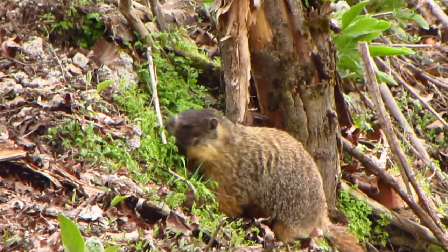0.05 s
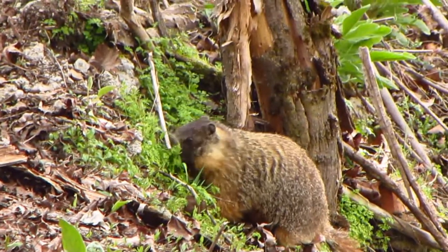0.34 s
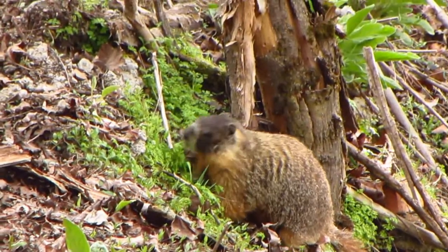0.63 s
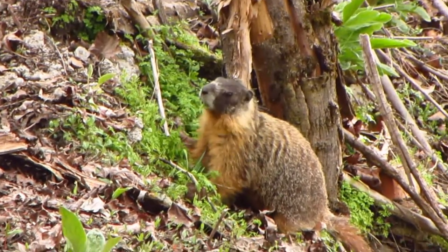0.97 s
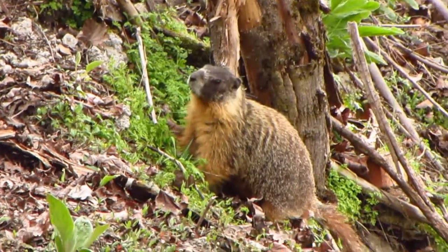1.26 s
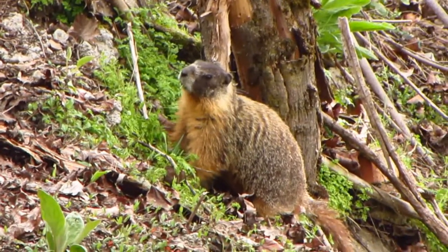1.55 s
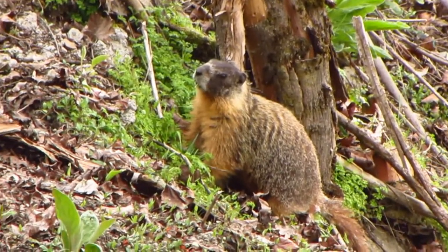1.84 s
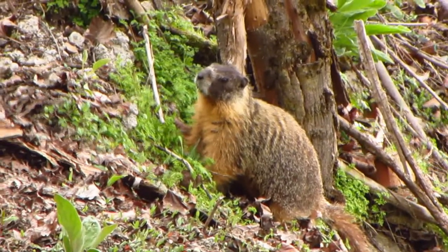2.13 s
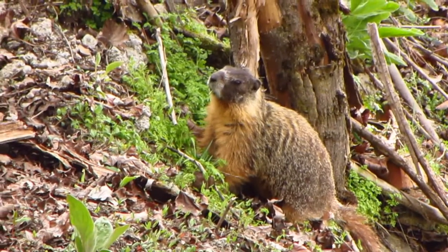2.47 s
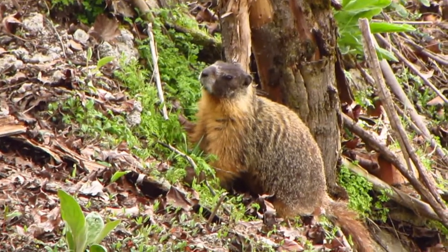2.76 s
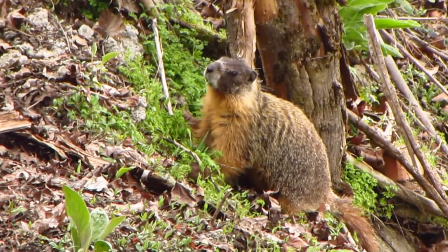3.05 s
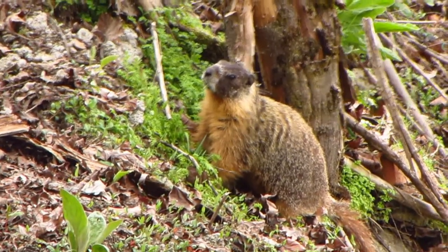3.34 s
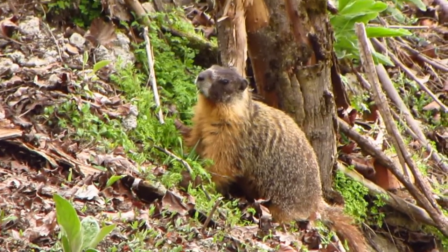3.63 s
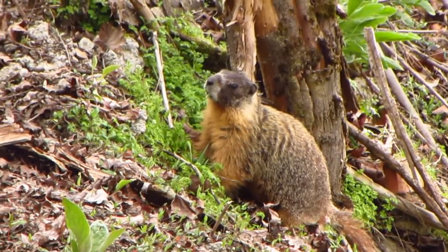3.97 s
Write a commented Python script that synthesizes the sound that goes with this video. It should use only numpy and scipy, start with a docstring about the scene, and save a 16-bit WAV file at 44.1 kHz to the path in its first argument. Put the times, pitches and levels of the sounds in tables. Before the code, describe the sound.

A low rush of distant traffic or wind runs throughout, with faint engine drones and microphone hiss. In the first second a marmot shifts on dry leaves: a small twig crack at 0.1 seconds, faint ticks and rustles, and three soft bumps around 0.4 to 0.7. At about 3.5 seconds a small animal on the right gives one quiet, sharp, falling chirp that echoes briefly in the trees.

```python
"""A marmot shifts on dry leaf litter on a wooded slope: leaves tick and crackle, its body bumps the
ground, and a twig rings as its fibres break. Near the end a small animal off to the right gives one
sharp chirp, a falling whistle shaped by its throat, which echoes from the left and scatters in the trees.
Far off are the low rush of traffic or wind and a few brief engine drones.
Under it all lies the faint hiss of the stereo microphones."""
import sys
import numpy as np
from scipy import signal
from scipy.fft import rfft, irfft
from scipy.io import wavfile
from scipy.ndimage import uniform_filter1d

SR = 44100
rng = np.random.default_rng(int(sys.argv[2]) if len(sys.argv) > 2 else 0)


def wav_record(signal):
    """Record a signal, one row per channel, as 16-bit PCM in the file named by sys.argv[1]."""
    frames = np.transpose(np.atleast_2d(signal))
    bounded = np.clip(frames, -1, 1)
    # unit amplitude maps onto the largest positive 16-bit level
    quanta = np.round(bounded * 32767).astype(np.int16)
    wavfile.write(sys.argv[1], SR, quanta)


N = 176400

# leaves and twigs ticking under the marmot: t/s, level/dB, f/Hz, width/octaves
LEAF_TICKS = [(.1285, -57, 10300, .2), (.161, -57, 10000, .4), (.2718, -51, 8500, .6),
              (.282, -59, 12000, .2), (.413, -58, 7000, .5), (.455, -58, 10500, .3),
              (.558, -56, 12000, .25), (.575, -55, 10500, .25), (.6615, -57, 6100, .1),
              (.6823, -56, 7000, .7), (.7475, -46, 9200, .2), (.7815, -56, 11500, .3),
              (.829, -51, 8700, .4), (0.9305, -48, 5830, 0.13), (1.2256, -58, 13000, .12)]
# its body on the ground: t/s, level/dB, f/Hz
BODY_BUMPS = [(.436, -21, 540), (.596, -20, 525), (.648, -25.5, 387)]
# rustles in the litter: centre t/s, half length/s, level/dB
LEAF_RUSTLES = [(.1, .12, -76), (.29, .03, -78), (.378, .018, -71.5), (.46, .07, -79), (.56, .018, -72),
                (.735, .025, -74), (.785, .006, -71), (.82, .04, -78)]
# resonances of the twig's wood: f/Hz, width/Hz, level/dB
WOOD_MODES = [(5000, 830, -3), (6490, 850, -1), (9500, 1100, 3), (11900, 700, -16), (14100, 640, -8)]
LITTER_LIKENESS, LITTER_PAN_DB = 0.61, -3  # at the microphones, a little to the right

# resonances of the small caller's throat: f/Hz, gain/dB
THROAT_COLOUR = [(2000, -23), (3100, -8), (3800, 0), (4800, -0.5), (5400, -2), (5850, 4), (6450, -14),
                 (7400, -3), (8700, -1), (9400, -17), (13000, -27)]
# the chirp's bright first echo: f/Hz, gain/dB
FIRST_ECHO_COLOUR = [(3500, -5), (6000, 0), (8500, 4)]
# scatter from the slope and the trees: delay/s, t60/s, level/dB
TREE_TAILS = [(.002, 0.108, -1.5), (0.017, .58, -3.5)]
# colour of that scatter: f/Hz, gain/dB
TREE_COLOUR = [(3500, 0), (4800, 1.5), (6000, -1), (8500, -2)]

# far engines: start t/s, length/s, f/Hz, level/dB
ENGINE_NOTES = [(-.15, 0.32, 171.1, -30), (.44, 1.1, 72.06, -43), (1.5, 0.81, 72.4, -48),
                (2.85, 1.18, 70.7, -49.5), (3.707, .47, 121, -33)]
# spectrum of the distant rush: f/Hz, relative level/dB
RUSH_SPECTRUM = [(15, -31), (25, -25.5), (50, -23.5), (68, -10.5), (90, -9.5), (120, -1.64), (160, -0.1),
                 (200, -7.5), (260, -3.5), (390, -10.5), (600, -9.5), (1000, -9), (1200, -14), (1450, -20),
                 (2300, -32.5), (3050, -43), (3800, -60), (5500, -100)]
# brief swells in its rumble: centre t/s, half length/s, f/Hz, rise/dB
RUMBLE_SWELLS = [(0.282, 0.025, 145, 5), (0.735, 0.023, 155, 6.5), (0.832, 0.029, 155, 6),
                 (0.983, 0.015, 160, 7), (1.08, 0.018, 118, 6), (1.45, 0.014, 140, 7.5),
                 (1.643, 0.045, 137, 8.5), (1.848, 0.044, 150, 9.5), (2.092, .02, 155, 4.5),
                 (2.412, 0.026, 164, 6.5), (2.664, .025, 140, 5.5), (2.76, 0.018, 125, 5),
                 (3.046, 0.015, 135, 8)]
# how alike the rush is at the two microphones: f/Hz, correlation
RUSH_LIKENESS = [(30, .94), (100, .96), (180, .96), (300, .93), (520, .87), (890, .79), (1520, .5),
                 (2600, .56)]
# its lean to the right: f/Hz, left minus right/dB
RUSH_BALANCE = [(60, -3), (91, -1.5), (140, -0.5), (210, -2), (320, -1), (490, -2), (740, -2.5), (1130, -1),
                (1710, -4.5), (2600, -2)]
# the microphones' own noise: f/Hz, relative level/dB
HISS_SPECTRUM = [(2500, -18), (3800, -5.5), (4700, 0.5), (7000, 0), (9300, -4), (10100, -3), (11200, -10.5),
                 (13400, -9.5), (15500, -20)]


def marmot_shifts(tick_decay_s=0.00071, tick_tail_s=.005, bump_decay_s=0.0045):
    """The marmot moves on the slope: dry leaves tick sharply and its body bumps softly on the ground."""
    out, t = np.zeros((2, N)), np.arange(4096) / SR
    lead_s = .012  # room for the band filter to ring ahead of each hit
    age = np.maximum(t - lead_s, 0)
    tick = (t >= lead_s) * (np.exp(-age / tick_decay_s) + amp(-18) * np.exp(-age / tick_tail_s))
    for s, db, hz, octaves in LEAF_TICKS:
        add(out, s - lead_s, amp(db) * pan(LITTER_PAN_DB) * burst(tick, hz, octaves, LITTER_LIKENESS))
    bump = age * np.exp(-age / bump_decay_s)
    for s, db, hz in BODY_BUMPS:
        add(out, s - lead_s, amp(db) * burst(bump, hz, octaves=0.27, likeness=0.63))
    return out


def leaf_rustle(grains_per_s=1000):
    """The litter under the animal gives way in clumps of tiny, high crackles."""
    t = np.arange(N) / SR
    grains = pair(rng.standard_normal((2, N)), LITTER_LIKENESS) * (rng.random(N) < grains_per_s / SR)
    clumps = sum(amp(db) * hump(t - s, half) for s, half, db in LEAF_RUSTLES)
    return clumps * evened(band(grains, centre_hz=10500, octaves=0.33))


def twig_crack(start_s=.141, level_db=-39, fibre_decay_s=0.0011):
    """A twig cracks just right of centre: a quick burst of breaking fibres rings the wood."""
    t, out = np.arange(SR // 20) / SR, np.zeros((2, N))
    fibres = pair(rng.standard_normal((2, len(t))), LITTER_LIKENESS) * amp(-16) * np.exp(-t / fibre_decay_s)
    fibres[:, 0] += 1  # the first break
    wood = sum(amp(db) * width * t * np.exp(-np.pi * width * t) * np.sin(2 * np.pi * hz * t)
               for hz, width, db in WOOD_MODES)
    crack = signal.fftconvolve(fibres, wood[None], axes=1)
    add(out, start_s, amp(level_db) * pan(LITTER_PAN_DB) * crack / abs(crack).max())
    return out


def chirp(length_s=.0095, from_hz=6400, to_hz=3400, roughness=.08, octave_late_s=.004, rasp_peak_s=.005):
    """A small throat shapes one fast-falling rough whistle, its octave and a rasp."""
    t = np.arange(SR // 20) / SR
    progress = np.clip(t / length_s, 0, 1)
    jitter = evened(uniform_filter1d(rng.standard_normal(len(t)), size=12))
    pitch_hz = (from_hz + (to_hz - from_hz) * progress) * (1 + roughness * jitter)
    phase = 2 * np.pi * np.cumsum(pitch_hz) / SR
    envelope = np.sin(np.pi * progress)
    octave = np.roll(envelope * np.sin(2 * phase), round(octave_late_s * SR))
    whistle = coloured(envelope * np.sin(phase) + amp(-5) * octave, THROAT_COLOUR)
    rasp = evened(coloured(rng.standard_normal(len(t)), THROAT_COLOUR))
    rasp *= t / rasp_peak_s * np.exp(1 - t / rasp_peak_s)
    return whistle + amp(-9.5) * rasp


def caller_in_trees(start_s=3.529, left_late_s=.0003, echo_late_s=.0135):
    """The chirp reaches the right microphone first, bounces back from the left and scatters."""
    call, out = amp(-45) * chirp(), np.zeros((2, N))
    direct = np.array([np.roll(call, round(left_late_s * SR)), call])
    add(out, start_s, pan(-8) * direct)
    add(out, start_s + echo_late_s, amp(-12) * pan(10) * coloured(call, FIRST_ECHO_COLOUR))
    add(out, start_s, tree_scatter(call))
    return out


def tree_scatter(call):
    """Dense near scatter and a longer tail, different at each microphone; leaves soak up the top."""
    t = np.arange(SR // 2) / SR
    tail = sum(amp(db) * evened(rng.standard_normal((2, len(t))) * (t > delay) * amp(-60 * t / t60))
               for delay, t60, db in TREE_TAILS)
    return coloured(signal.fftconvolve(call[None], tail / np.sqrt(len(t)), axes=1), TREE_COLOUR)


def far_engines(fade_s=0.11, waver=.015):
    """Engines a long way off, slightly right: low notes fade in, waver and fade out."""
    t, out = np.arange(N) / SR, np.zeros(N)
    for start, length, hz, db in ENGINE_NOTES:
        fade = np.clip(np.minimum(t - start, start + length - t) / fade_s, 0, 1)
        phase = 2 * np.pi * np.cumsum(hz * (1 + waver * drift(t, rate_hz=8.05))) / SR
        level = amp(db + 1.6 * drift(t, rate_hz=5.77))
        out += level * fade * np.sqrt(2) * np.sin(phase)
    return out * pan(-2)


def distant_rush(level_db=-29, right_lead_s=.00004, frame=2048):
    """Traffic or wind in the distance: dull noise with drifting patches and a heaving low rumble."""
    hop = frame // 4
    t, hz = np.arange(N // hop + 5) * hop / SR, np.fft.rfftfreq(frame, 1 / SR)
    real, imag = rng.standard_normal((2, 2, len(t), len(hz)))
    spectra = pair(real + 1j * imag, read(RUSH_LIKENESS, hz))
    spectra[0] *= np.exp(-2j * np.pi * hz * right_lead_s)
    patches = uniform_filter1d(rng.standard_normal((len(t), len(hz))), size=8, axis=0)
    patch_db = 0.5 * evened(uniform_filter1d(patches, size=10, axis=1))
    wander_db = 0.8 * drift(t, rate_hz=3.73)[:, None]
    swell_db = sum(db * hump(t[:, None] - s, half) * bell(hz, centre, octaves=0.19)
                   for s, half, centre, db in RUMBLE_SWELLS)
    spectra *= amp(read(RUSH_SPECTRUM, hz) + patch_db + wander_db + swell_db)
    balance_db = read(RUSH_BALANCE, hz)
    spectra *= amp(np.array([balance_db, -balance_db]) / 2)[:, None]
    _, rush = signal.istft(spectra.swapaxes(1, 2), nperseg=frame, noverlap=frame - hop)
    return amp(level_db) * evened(rush[:, :N])


def microphone_hiss(hiss_db=-68, whine_db=-93, whine_hz=12971):
    """The microphones' own even hiss and a faint electronic whine."""
    hiss = evened(coloured(pair(rng.standard_normal((2, N)), likeness=0.11), HISS_SPECTRUM))
    whine = np.sqrt(2) * np.sin(2 * np.pi * whine_hz * np.arange(N) / SR)
    return amp(hiss_db) * hiss + amp(whine_db) * whine


def amp(db):
    """Decibels to gain."""
    return 10 ** (np.asarray(db) / 20)


def evened(x):
    """Scales to an rms of 1."""
    return x / np.sqrt(np.mean(x ** 2) + 1e-20)


def read(points, hz):
    """Reads a table on a log-frequency axis."""
    f, value = np.transpose(points)
    return np.interp(np.log(hz + 1), np.log(f + 1), value)


def add(mix, start_s, sound):
    """Lays a stereo sound into the mix."""
    part = mix[:, round(start_s * SR):][:, :sound.shape[1]]
    part += sound[:, :part.shape[1]]


def pan(db):
    """Gains at the two microphones for a level difference, left minus right."""
    return amp(np.array([[db], [-db]]) / 2)


def pair(noises, likeness):
    """Makes two unrelated noises partly alike, one for each microphone."""
    left, other = noises
    return np.array([left, likeness * left + np.sqrt(1 - likeness ** 2) * other])


def hump(offset, width):
    """A Gaussian curve, peak 1."""
    return np.exp(-.5 * (offset / width) ** 2)


def bell(hz, centre_hz, octaves):
    """A bell-shaped band on a log-frequency axis."""
    return hump(np.log2((hz + 1) / centre_hz), octaves)


def band(x, centre_hz, octaves):
    """Keeps one band of a sound."""
    size = x.shape[-1]
    return irfft(rfft(x) * bell(np.fft.rfftfreq(size, 1 / SR), centre_hz, octaves), size)


def coloured(x, points):
    """Filters a sound by a table of f/Hz, gain/dB."""
    size = x.shape[-1]
    return irfft(rfft(x) * amp(read(points, np.fft.rfftfreq(size, 1 / SR))), size)


def burst(envelope, hz, octaves, likeness):
    """A stereo burst of noise in one band, peak 1."""
    noise = band(pair(rng.standard_normal((2, len(envelope))), likeness) * envelope, hz, octaves)
    return noise / abs(noise).max()


def drift(t, rate_hz):
    """Slow random wandering, rms 1."""
    rates = np.geomspace(rate_hz / 10, rate_hz, 20)
    return evened(sum(np.sin(2 * np.pi * (f * t + rng.random())) / np.sqrt(f) for f in rates))


def scene():
    """The wooded slope as it reaches the microphones."""
    distance = distant_rush() + far_engines()
    marmot = marmot_shifts() + leaf_rustle() + twig_crack()
    return marmot + caller_in_trees() + distance + microphone_hiss()


def record(dry, fade_s=.004, cutoff_hz=15750):
    """Soft ends and the recorder's band limit."""
    t = np.arange(N) / SR
    fade = np.sin(np.pi / 2 * np.clip(np.minimum(t, t[-1] - t) / fade_s, 0, 1)) ** 2
    lowpass = signal.firwin(511, cutoff_hz, window=("kaiser", 9), fs=SR)
    return signal.oaconvolve(dry * fade, lowpass[None], "same")


dry = scene()
out = record(dry)
wav_record(out)
```